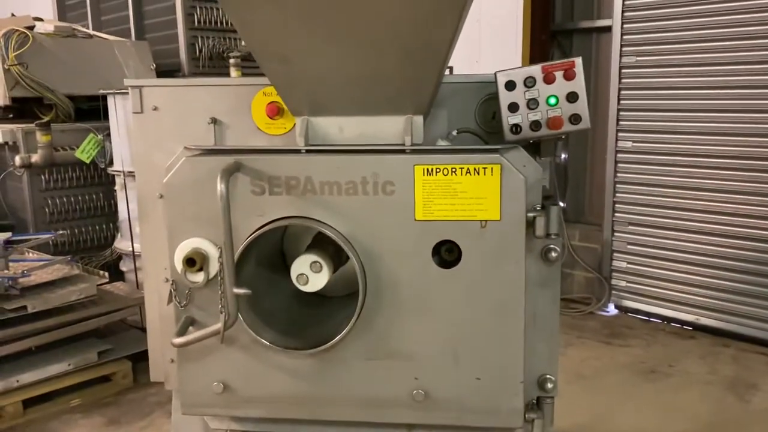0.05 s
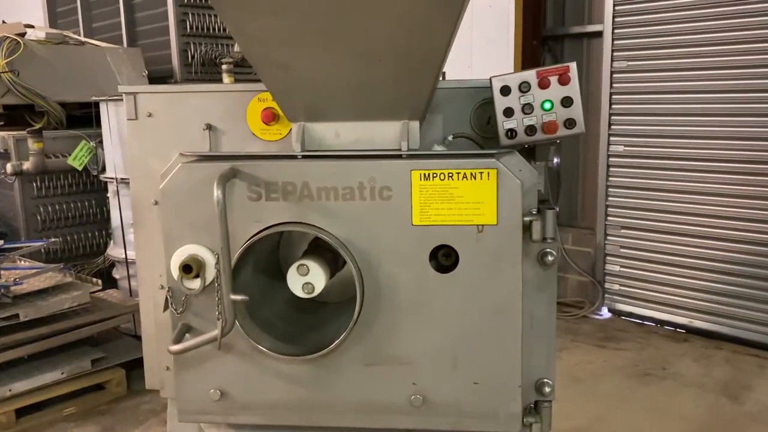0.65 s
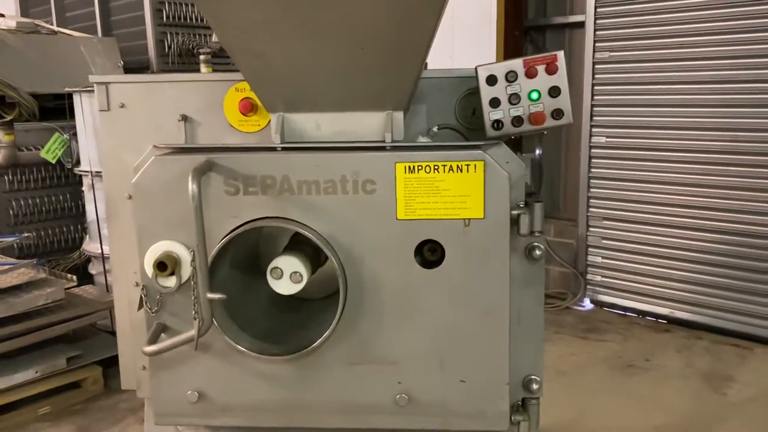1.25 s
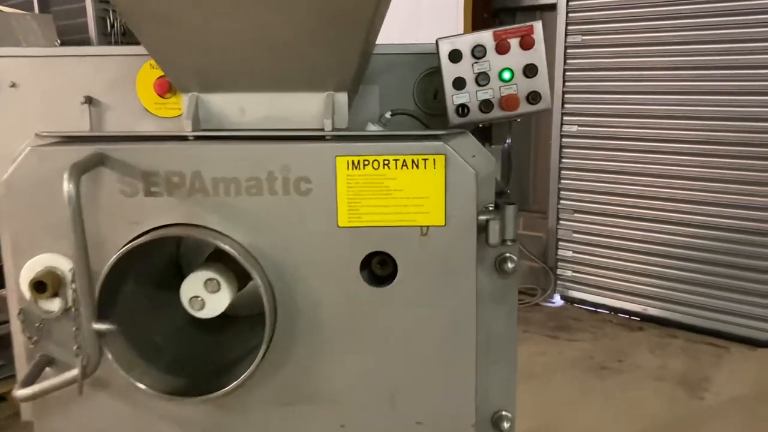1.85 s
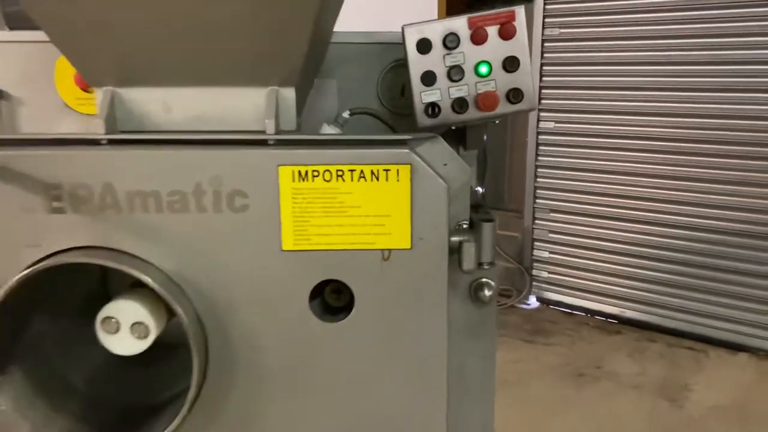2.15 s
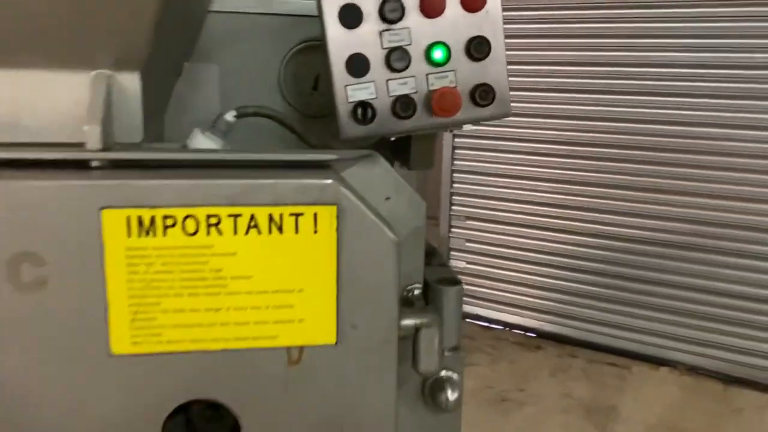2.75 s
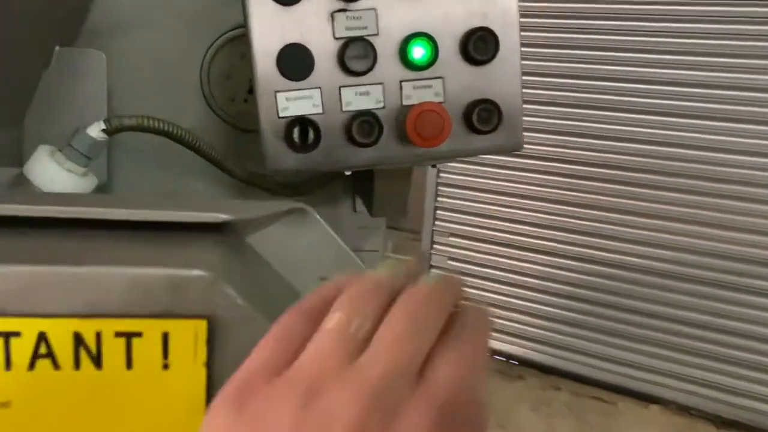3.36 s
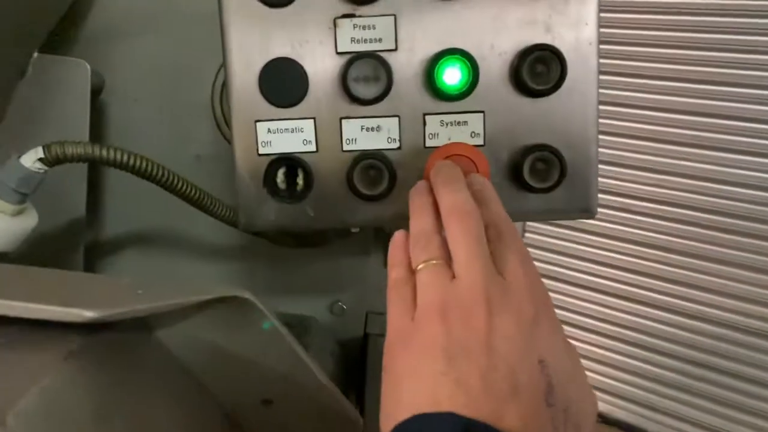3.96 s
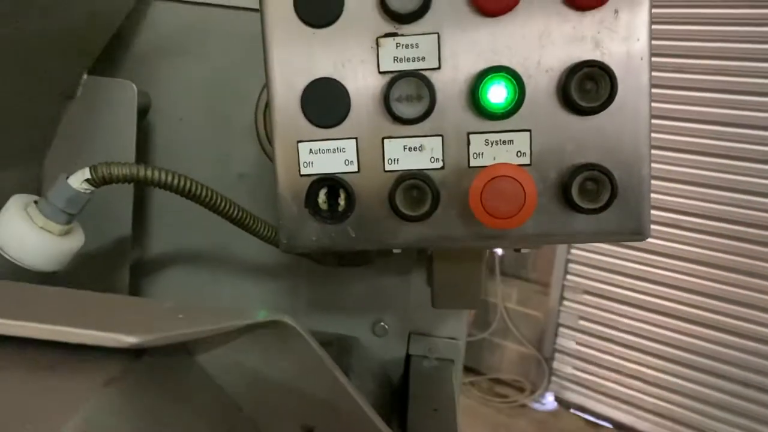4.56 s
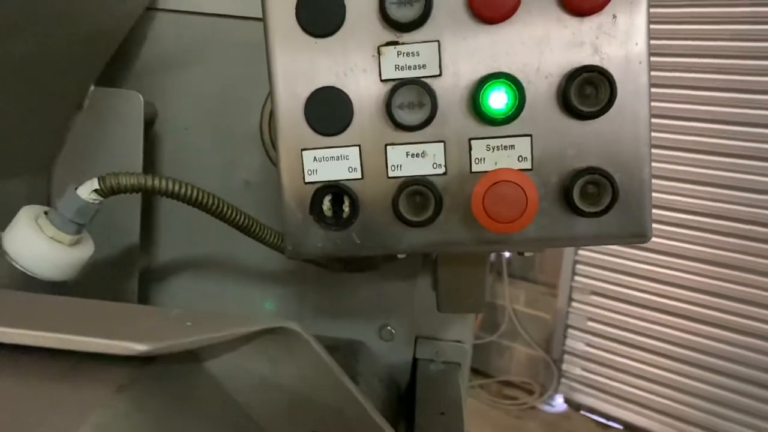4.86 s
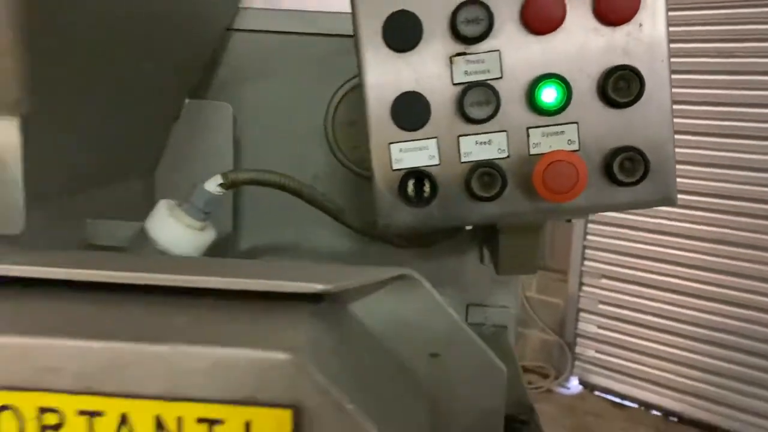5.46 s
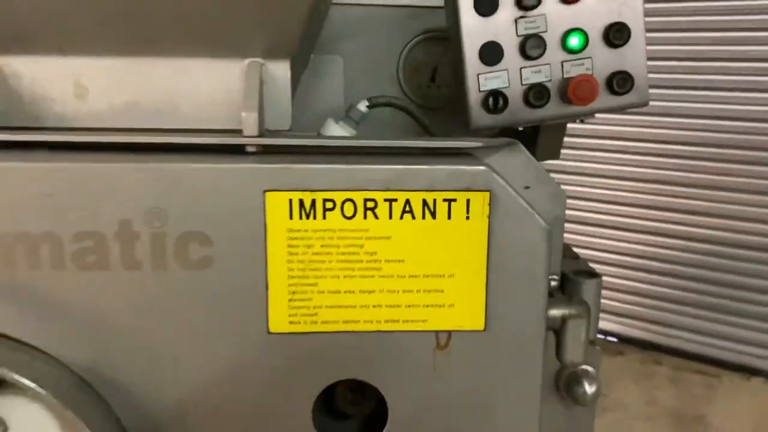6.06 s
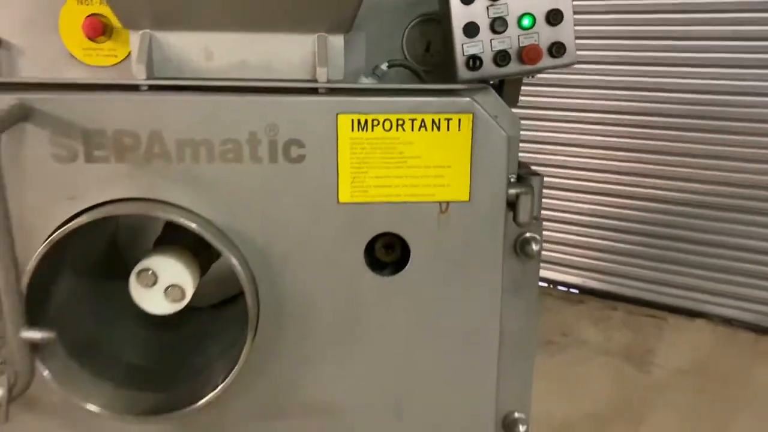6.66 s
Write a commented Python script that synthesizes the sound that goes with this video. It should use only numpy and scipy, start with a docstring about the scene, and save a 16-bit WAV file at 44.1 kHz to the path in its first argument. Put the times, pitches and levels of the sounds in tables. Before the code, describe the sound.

A large steel machine runs in a warehouse with a steady low rumble, clattering panels, rattling loose parts and a belt scouring a metal drum. It surges about every two seconds, and a drone grows as the microphone moves closer. A little past four seconds a stop button snaps with a dull clunk, and the drive coasts down with a few knocks and a brief whirr, leaving a faint hum.

```python
"""A warehouse, a stereo pair in front of a belt-and-drum food separator running empty. Its drive rumbles
in the steel housing, panels clatter, the belt scours the drum and loose parts rattle, swelling about every
two seconds as the belt binds. The microphone moves in close to the control box, the stop button is pressed
and let go, and the drive coasts to rest, leaving the faint hum of other equipment in the hall."""
import sys
import numpy as np
from scipy import signal
from scipy.fft import rfft, irfft, next_fast_len
from scipy.io import wavfile
from scipy.ndimage import uniform_filter1d, minimum_filter1d

SR = 44100
rng = np.random.default_rng(int(sys.argv[2]) if len(sys.argv) > 2 else 0)


def wav_out(sig):
    """Save sig, one row per channel (or a flat mono array), as 16-bit PCM at SR to the path in sys.argv[1]."""
    wavfile.write(sys.argv[1], SR, np.round(np.clip(np.atleast_2d(sig).T, -1, 1) * 32767).astype(np.int16))


N = 295470
TIME = np.arange(N) / SR
POWER_OFF_S, STANDSTILL_S, HALL_T60_S = 4.24, 5.92, 1.52

# Speed of the motor shaft: time_s, turns_hz
SHAFT_SPEED = [(0, 16.14), (4.08, 16.14), (4.26, 14.75), (5.0, 9.5), (5.9, 1.5)]
# Microphone's path, from in front (0) to the control box (1): time_s, nearness
NEARNESS = [(0, 0.1), (1.8, 0.21), (2.6, 0.46), (3.35, 0.88), (5.3, 0.98), (6.7, 0)]
# Knocks of loose parts: start_s, level_db (levels in all tables are relative)
KNOCKS = [(.5561, -30), (.99, -24.5), (1.2331, -33), (1.853, -26), (1.997, -34), (2.1221, -29),
          (2.285, -29), (2.435, -30), (2.5536, -30), (2.7896, -26), (2.834, -25.5), (2.9726, -25),
          (3.068, -19), (3.2016, -21), (3.4326, -28), (3.459, -28), (3.5169, -28), (3.5793, -31),
          (3.6232, -22.5), (3.7469, -27), (3.8697, -23.5), (3.99, -29), (4.0607, -29.5), (4.1649, -28),
          (4.1854, -29), (4.455, -27), (4.6423, -29), (4.7262, -26.5), (4.785, -25.5), (4.9162, -26.5),
          (4.9377, -26), (5.025, -21.5), (5.285, -31), (5.7, -41)]
# Spectra of the frame's rumble and the belt's hiss: frequency_hz, level_db
FRAME_COLOUR = [(20, -38), (35, -7), (50, -17), (68, 5.5), (90, -2), (115, 2.5), (150, -38)]
BELT_COLOUR = [(4500, -11), (7500, 2), (9500, -19), (11000, 19), (15500, 4)]


def drive(shaft):
    """Teeth and rollers make countless contacts, fewer as the shaft slows, and shake the machine."""
    activity = shaft / shaft[0] + .25
    throb = np.sin(2 * np.pi * np.cumsum(shaft) / SR)  # the load is uneven over each turn
    contacts = impacts(3000 * activity, scatter_db=2.5) * undb(.5 * throb)
    frame = noise(FRAME_COLOUR) * strength(idle_db=-44, per_load=0.3, near_db=9, slowing_db=24)
    return frame + panels(contacts) + drum(activity) + housing(contacts) + rattle(activity)


def housing(contacts):
    """The steel housing rumbles with the load; jolts from the drive make its lowest resonance boom."""
    # Spectra of rumble and boom: frequency_hz, level_db
    rumble_colour = [(70, -53), (100, -16.5), (120, -9.5), (142, -7.5), (165, -0.5), (190, -1.5), (212, 0),
                     (235, -8), (265, -14.5), (305, -10), (380, -16.5), (600, -17)]
    boom_colour = [(100, -30), (135, -19), (160, 2), (180, 5.5), (205, 4.5), (240, -11.5), (320, -22),
                   (500, -40)]
    # Jolts: start_s, level_db
    jolts = [(0.0, -15), (.16, -12), (.27, -18), (.96, -13), (1.008, -10), (1.11, -14), (1.17, -15.5),
             (1.36, -16), (2.38, -17), (2.53, -16), (2.822, -6), (2.95, -9), (3.03, -11), (3.2, -29),
             (3.86, -16.5), (4.06, -18), (4.33, -18), (4.78, -14), (4.94, -17), (5.1, -25), (5.22, -40),
             (5.49, -19.5)]
    rumble, boom = (stereo(steady(colour(contacts, spectrum), span_s=0.068), mono_noise(spectrum))
                    for spectrum in (rumble_colour, boom_colour))
    rumble *= strength(idle_db=-28.5, per_load=1.11, near_db=5, slowing_db=23)
    return rumble + boom * undb(-4) * blows(jolts, rise_s=0.016, t60=0.33)


def panels(contacts):
    """The panels clatter under the contacts; a few of their modes come up near the control box."""
    # Spectrum of the clatter: frequency_hz, level_db
    panel_colour = [(200, 1), (300, 6), (345, 4.5), (420, 1), (500, -2.5), (575, -4.5), (720, -4.5),
                    (860, -2), (1000, -3), (1110, -2.5), (1250, -10), (1750, -15), (2400, -20.5),
                    (5000, -66)]
    # Panel modes: pitch_hz, width_hz, level_db
    near_modes = [(300, 30, 0), (515, 20, -8), (570, 22, -1), (1110, 35, -4)]
    clatter = steel_part(contacts, panel_colour, t60=0.054, hall_db=-4)
    clatter *= strength(idle_db=-28, per_load=1.32, near_db=3.5, slowing_db=24)
    ringing = resonances(contacts, near_modes)
    return clatter + ringing * strength(idle_db=-44, per_load=1.5, near_db=6, slowing_db=21)


def drum(activity):
    """The belt scours the perforated drum: clear, wavering modes stand out of a dense metallic ring."""
    # Drum modes: pitch_hz, width_hz, level_db, near_boost_db
    drum_modes = [(1022, 12, 2.5, -6), (1113, 9, 1, 3), (1193, 8, 3.5, -1), (1248, 10, 1, 0),
                  (1355, 14, -2, -2), (1412, 9, 2.5, 0), (1442, 7, 1.5, -3), (1539, 9, 1.5, -2),
                  (1587, 7, -8, 6), (1795, 16, -2, -7), (1873, 10, 1.5, -8), (2530, 70, -4, -2),
                  (2670, 11, -4, -3)]
    # Spectrum of the dense ring: frequency_hz, level_db
    ring_colour = [(1000, -37), (1280, 2.5), (1450, 2), (1600, -4), (1720, -1), (1850, -2), (2050, -9),
                   (2300, -16), (2600, -10.5), (3100, -48)]
    # The machine's edge hides the drum's opening as the microphone passes: time_s, gain_db
    shade = [(0, 0), (3.05, 0), (3.33, -4), (5.3, -7.5), (5.9, -2)]
    near = curve(NEARNESS)
    forces = np.array([impacts(2500 * activity, scatter_db=4.5) for _ in range(2)])
    modes = sum(resonance(forces, hz, width_hz) * undb(db + near_db * near + 1.2 * wander(3.47))
                for hz, width_hz, db, near_db in drum_modes)
    dense = steel_part(forces[0], ring_colour, t60=0.051, hall_db=-8)
    gain = strength(idle_db=-32.5, per_load=0.27, near_db=0.5, slowing_db=24) * undb(curve(shade))
    return (undb(-1.5) * stereo(*unit(modes)) + dense) * gain


def rattle(activity):
    """Loose parts chatter under load and after each knock, and now and then tap."""
    # Spectrum of the chatter: frequency_hz, level_db
    chatter_colour = [(1200, -41), (1900, 8.5), (2550, 7), (3300, 4.5), (4400, -0.5), (5500, -7.5),
                      (7600, -10), (8500, -58), (11000, -9.5), (15500, -66)]
    shaking = impacts(1500 * activity, scatter_db=2.5) * undb(2 * wander(27.96))
    chatter = steel_part(shaking, chatter_colour, t60=0.048, hall_db=-10, even_hz=201)
    tapping = impacts(40 * activity, scatter_db=8.5)
    taps = steel_part(tapping, knock_colour(), t60=0.035, hall_db=-20, even_hz=450)
    running = strength(idle_db=-43.5, per_load=1.25, near_db=6, slowing_db=41)
    stirred = undb(-6) * blows(KNOCKS, rise_s=0.0049, t60=0.2)
    return (chatter + undb(-10.5) * taps) * np.hypot(running, stirred)


def gears(shaft):
    """Shaft harmonics carry in front, gear tones by the control box; all sink as the motor slows."""
    # Shaft harmonics: multiple, level_db
    orders = [(3, -43.5), (4, -40.5), (6, -40), (7, -40.5), (12, -30.5)]
    # Gear whine at full speed: pitch_hz, level_db
    whine_partials = [(289, -30), (511, -39), (654, -39.5), (1141, -39.5)]
    # Gear mesh drone at the microphone: time_s, level_db
    drone_level = [(0, -40), (.3, -38), (.45, -31.5), (1.6, -29.5), (2.3, -29.5), (2.52, -22.5),
                   (2.78, -25), (3.08, -20), (3.3, -22), (3.65, -21.5), (4.1, -21), (4.24, -24)]
    mesh_hz = 240.4
    speed, near = shaft / shaft[0], curve(NEARNESS)
    harmonics = sum(undb(db) * tone(multiple * shaft, waver_db=2, waver_hz=3.74, drift=0.0016)
                    for multiple, db in orders)
    whine = sum(undb(db) * tone(hz * speed, waver_db=3, waver_hz=10, drift=.003)
                for hz, db in whine_partials)
    powered = undb(curve(drone_level)) * fade(POWER_OFF_S, t60=0.088)
    drone = powered * tone(mesh_hz * speed, waver_db=.6, waver_hz=6, drift=0.001)
    return drone + (harmonics * undb(-8 * near) + whine * near) * speed ** 3


def crunches():
    """A burst of coarse contacts shakes the panels each time the belt catches."""
    # Catches: start_s, level_db
    catches = [(.91, -20.5), (.96, -24.5), (1.01, -20), (1.12, -23), (1.2, -32), (1.28, -28), (1.39, -22),
               (2.96, -16), (3.04, -18), (3.21, -17), (4.71, -21), (4.9, -24)]
    # Their spectrum: frequency_hz, level_db
    spectrum = [(200, 8), (290, 12), (410, 4), (560, -6), (720, -9), (1020, 5.5), (1400, -6.5),
                (2100, -8.5), (2900, -19), (5000, -28)]
    crunch = steel_part(impacts(900, scatter_db=2), spectrum, t60=0.021, hall_db=-13, even_hz=120)
    return crunch * blows(catches, rise_s=.006, t60=0.41)


def belt_scrapes():
    """Under heavy load, fine uneven slips of the belt rasp on the drum's rim."""
    # Scrapes: start_s, rise_s, hold_s, release_s, level_db
    scrapes = [(2.811, 0.024, 0.24, 0.24, -32.5), (4.88, .06, .12, .1, -43)]
    # Their spectrum: frequency_hz, level_db
    spectrum = [(1700, -14), (2120, 0), (2300, -7), (2580, 2), (2760, -1), (2900, -16), (3450, -7),
                (3900, -13), (5500, -24), (7200, -19), (7700, -11), (8400, -24)]
    rasp = steel_part(impacts(900, scatter_db=6), spectrum, t60=0.033, hall_db=-11, even_hz=150)
    return rasp * sum(undb(db) * swell(*timing) for *timing, db in scrapes)


def belt_rubs():
    """Where the belt rubs harder, two neighbouring drum modes sing out and beat."""
    # Rubs: start_s, rise_s, hold_s, release_s, lower_hz, upper_hz, level_db
    rubs = [(0.026, .08, .68, 0.15, 1412, 1445, -35), (1.12, 0.1, 0.12, 0.45, 1414, 1442, -37),
            (1.85, 0.4, .3, .15, 1539, 1587, -38.5)]
    out = np.zeros(N)
    for *timing, lower_hz, upper_hz, db in rubs:
        pair = sum(tone(hz, waver_db=2, waver_hz=18, drift=.002) for hz in (lower_hz, upper_hz))
        out += unit(pair) * undb(db) * swell(*timing)
    return out


def belt_drag():
    """On its last turns the belt drags with a whirr and a hiss."""
    # Whirring modes: pitch_hz, width_hz, level_db
    whirr_modes = [(840, 30, 0), (1380, 45, 0), (1490, 50, -2), (1790, 40, -7), (2020, 40, -15),
                   (2320, 25, -10), (2540, 70, -6), (2630, 30, -11)]
    # Spectrum of the hiss: frequency_hz, level_db
    hiss_colour = [(1400, 1), (2950, -5), (5000, 4), (7000, -3), (10000, -19)]
    forces = np.array([impacts(1500, scatter_db=0) for _ in range(2)])
    whirr = stereo(*resonances(forces, whirr_modes)) * undb(-46)
    hiss = noise(hiss_colour) * undb(-62.5)
    return (whirr + hiss) * swell(start_s=5.537, rise_s=0.2, hold_s=0.19, release_s=0.24)


def belt_hiss():
    """The running belt hisses unevenly, fainter beside the control box."""
    hiss = noise(BELT_COLOUR) * undb(0.95 * wander(33) + wander(4.3))
    return hiss * strength(idle_db=-69, per_load=0.56, near_db=-12, slowing_db=19)


def belt_swishes():
    """The belt gives short, very high swishes."""
    # Swishes: start_s, level_db
    swishes = [(.18, -51), (.27, -50), (.978, -45), (2.105, -48), (2.455, -45), (2.785, -46), (4.03, -52),
               (4.18, -48), (4.3, -50), (6.125, -50.5)]
    return noise(BELT_COLOUR) * blows(swishes, rise_s=0.004, t60=0.25)


def knocks():
    """Loose parts knock; close to the control box the crack of the first contact comes through."""
    # Spectrum of the crack: frequency_hz, level_db
    crack_colour = [(1500, 2), (2600, 7), (3600, -3), (5000, 4.5), (7400, -1), (9000, -26.5), (15000, -16)]
    body = clicks(KNOCKS, knock_colour(), t60=0.17, gain_db=-2.5, hall_db=-10)
    crack = clicks(KNOCKS, crack_colour, t60=0.025, gain_db=-4, hall_db=-18)
    return body + crack * curve(NEARNESS) ** 2


def clunk():
    """One dull clunk in the machine carries into the hall."""
    # The blow: start_s, level_db
    blow = [(4.343, -13)]
    # Its spectrum: frequency_hz, level_db
    spectrum = [(200, 3), (450, -10), (1100, 3), (2200, -18.5), (5000, -22)]
    return clicks(blow, spectrum, t60=.2, gain_db=-7, hall_db=4)


def stop_button():
    """Close up, the stop button snaps back and its spring rings."""
    # Snaps: start_s, level_db
    snaps = [(4.3216, -27.5), (4.364, -20), (4.3924, -29), (4.4084, -27.5)]
    # Their spectrum: frequency_hz, level_db
    spectrum = [(800, -25), (2400, 14), (4000, 4), (5500, 5), (7200, 5), (9000, -16), (11000, -5),
                (15500, -31)]
    # Spring modes: pitch_hz, level_db, t60_s
    modes = [(5500, -13, .05), (6650, -12, .06), (7300, -15, .04)]
    return clicks(snaps, spectrum, t60=0.14, gain_db=-5, hall_db=-16) + struck_modes(snaps, modes)


def ticks():
    """A part ticks sharply and rings for an instant."""
    # Ticks: start_s, level_db
    hits = [(3.074, -16), (3.083, -27), (5.025, -29), (5.2842, -28), (6.124, -42)]
    # Their spectrum: frequency_hz, level_db
    spectrum = [(1500, 1), (3800, -9), (6000, 1), (8000, 6), (11000, 5.5), (15500, -3)]
    # The part's modes: pitch_hz, level_db, t60_s
    modes = [(6080, -12, .05), (7700, -16, .04)]
    return clicks(hits, spectrum, t60=0.026, gain_db=-10, hall_db=-7) + struck_modes(hits, modes)


def clinks():
    """A loose steel part clinks in a few clear modes."""
    # Clinks: start_s, level_db
    hits = [(1.234, -34), (3.0735, -31), (5.025, -30.5), (5.285, -43)]
    # The part's modes: pitch_hz, level_db, t60_s
    modes = [(2370, -2, .22), (2555, -1, .22), (3860, 0, 0.19), (4290, -10, 0.12), (6220, -5, 0.04),
             (6480, -7, .05)]
    return struck_modes(hits, modes)


def settling():
    """Soft scuffs and low bumps of the frame as the drive comes to rest."""
    # Scuffs and bumps: start_s, level_db
    scuffs = [(6.14, -53), (6.235, -51), (6.45, -62)]
    bumps = [(5.97, -42), (6.13, -40.5)]
    # Spectrum of the scuffs: frequency_hz, level_db
    scuff_colour = [(600, -15), (1500, 1.5), (2600, 3.5), (5000, -3), (7000, -6), (15000, -12.5)]
    scuffing = noise(scuff_colour) * blows(scuffs, rise_s=0.012, t60=0.81)
    return scuffing + noise(FRAME_COLOUR) * blows(bumps, rise_s=0.016, t60=0.47)


def hall():
    """Other equipment hums on, a little roughly, over low room tone."""
    # Hum: pitch_hz, level_db
    partials = [(75.4, -56), (145.3, -50), (207, -64), (263.8, -59.5)]
    # Room tone: frequency_hz, level_db
    room_colour = [(22, -24), (45, -7), (62, 0.5), (78, 2), (105, -21), (200, -20), (320, -20), (550, -27),
                   (1500, -34.5), (3000, -44), (7000, -64), (15000, -47)]
    hum = sum(undb(db) * tone(hz, waver_db=1.5, waver_hz=25, drift=0.006) for hz, db in partials)
    room_db = -49 + 1.2 * wander(3.8)
    return hum + noise(room_colour) * undb(room_db)


def knock_colour():
    """The spectrum that loose parts ring with when they knock or tap."""
    # frequency_hz, level_db
    spectrum = [(500, 19.5), (1200, 9), (2700, 10.5), (4300, -5.5), (5600, -6), (7500, -1.5), (9500, -36.5),
                (15500, -19)]
    return spectrum


def strength(idle_db, per_load, near_db, slowing_db):
    """A part's gain follows load and microphone position, and loses slowing_db per tenfold slowing."""
    # The belt binds and loads the drive: start_s, rise_s, hold_s, release_s, load_db
    surges = [(0.85, 0.18, 0.32, 0.42, 4), (1.851, 0.18, 1, 0.53, 1.45), (2.697, 0.15, 0.3, 0.27, 3.5),
              (4.606, 0.38, 0.045, 0.13, 4)]
    load_db = sum(db * swell(*timing) for *timing, db in surges)
    shaft = curve(SHAFT_SPEED)
    quiet_below = 0.44  # share of full speed
    coast_db = slowing_db * np.log10(np.minimum(shaft / shaft[0] / quiet_below, 1))
    return undb(idle_db + per_load * load_db + near_db * curve(NEARNESS) + coast_db)


def impacts(rate_hz, scatter_db):
    """Random contacts of uneven size; their rate may move."""
    hit = rng.random(N) < rate_hz / SR
    size = undb(scatter_db * np.minimum(rng.exponential(size=N), 3))
    return unit(hit * size * rng.choice([-1, 1], N) / np.sqrt(rate_hz))


def steel_part(force, spectrum, t60, hall_db, even_hz=80):
    """Steel rings under contacts that keep shifting from place to place, and the hall answers."""
    def channel():
        direct = ring(force, t60, even_hz, count=24)
        reverb = undb(hall_db) * ring(force, HALL_T60_S, count=4)
        return unit(colour(direct + reverb, spectrum))
    return stereo(channel(), channel())


def ring(x, t60, even_hz=160, count=1):
    """Excite a crowd of close, decaying modes, drawn anew for each of count stretches of time."""
    t = TIME[:int(t60 * SR) + 2]
    size = next_fast_len(2 * len(t))
    out = np.zeros(N + len(t))
    for span in np.array_split(np.arange(N), count):
        response = rfft(rng.standard_normal(2 * SR)[:len(t)] * decay(t, t60), size)
        # level the spectrum by its mean power within even_hz either side
        power = uniform_filter1d(np.abs(response) ** 2, size=int(2 * even_hz * size / SR) + 1)
        rung = signal.fftconvolve(x[span], irfft(response / np.sqrt(power), size)[:len(t)])
        out[span[0]:span[0] + len(rung)] += rung
    return out[:N]


def clicks(hits, spectrum, t60, gain_db, hall_db):
    """Each blow is a short burst of dense modes with a tail from the hall."""
    envelope = undb(gain_db) * blows(hits, rise_s=.0007, t60=t60)
    mid, side = (envelope * mono_noise(spectrum) for _ in range(2))
    return stereo(*(x + undb(hall_db) * ring(x, HALL_T60_S / 2) for x in (mid, side)))


def struck_modes(hits, modes):
    """Each blow sets the same few modes ringing, in a different phase at each capsule."""
    out = np.zeros((2, N))
    for start_s, hit_db in hits:
        start = int(start_s * SR)
        t = TIME[:min(SR // 2, N - start)]
        for hz, db, t60 in modes:
            phase = 2 * rng.random((2, 1))
            envelope = undb(hit_db + db) * np.minimum(t * hz / 2, 1) * decay(t, t60)
            out[:, start:start + len(t)] += np.sin(2 * np.pi * hz * t + phase) * envelope
    return out


def resonance(x, hz, width_hz):
    """One ringing mode at rms 1."""
    pole = np.exp(-np.pi * width_hz / SR)
    return unit(signal.lfilter([1, 0, -1], [1, -2 * pole * np.cos(2 * np.pi * hz / SR), pole ** 2], x))


def resonances(x, modes):
    """Several modes under one force, together at rms 1."""
    return unit(sum(undb(db) * resonance(x, hz, width_hz) for hz, width_hz, db in modes))


def tone(hz, waver_db, waver_hz, drift):
    """A partial whose level and pitch waver."""
    turns = np.cumsum(hz * (1 + drift * wander(waver_hz))) / SR + rng.random()
    return unit(np.sin(2 * np.pi * turns) * undb(waver_db * wander(waver_hz)))


def noise(spectrum):
    """Coloured stereo noise."""
    return stereo(mono_noise(spectrum), mono_noise(spectrum))


def mono_noise(spectrum):
    """Coloured noise at rms 1."""
    return unit(colour(rng.standard_normal(N), spectrum))


def stereo(mid, side):
    """Bass reaches both capsules alike; treble comes from all around."""
    # Stereo width: frequency_hz, side_gain_db
    width = [(60, -24), (130, -33), (290, -16.5), (640, -7), (1400, -5), (3100, -4.5), (7000, -7),
             (9000, 4), (15000, -3)]
    side = irfft(rfft(side) * undb(per_bin(width)), N)
    return np.array([mid + side, mid - side])


def colour(x, spectrum):
    """Filter by a spectrum that falls away beyond its ends."""
    (low_hz, low_db), (high_hz, high_db) = spectrum[0], spectrum[-1]
    closed = [(low_hz / 4, low_db - 60), *spectrum, (high_hz * 4, high_db - 60)]
    return irfft(rfft(x) * undb(per_bin(closed)), N)


def per_bin(points):
    """Join (Hz, value) points on a log-frequency axis."""
    hz, value = np.transpose(points)
    return np.interp(np.log(np.maximum(np.fft.rfftfreq(N, 1 / SR), 1)), np.log(hz), value)


def blows(hits, rise_s, t60):
    """Envelope of a row of blows: each builds quickly and dies away."""
    envelope = np.zeros(N)
    for start_s, db in hits:
        start = int(start_s * SR)
        t = TIME[:min(SR, N - start)]
        envelope[start:start + len(t)] += undb(db) * (1 - np.exp(-t / rise_s)) * decay(t, t60)
    return envelope


def swell(start_s, rise_s, hold_s, release_s):
    """Rise to 1, hold and let go."""
    return np.interp(TIME, start_s + np.cumsum([0, rise_s, hold_s, release_s]), [0, 1, 1, 0])


def fade(start_s, t60):
    """Full strength up to a moment, then a steady decay."""
    return decay(np.maximum(TIME - start_s, 0), t60)


def decay(t, t60):
    """Fall by 60 dB every t60 seconds."""
    return np.exp(-np.log(1000) * t / t60)


def curve(points):
    """Join (s, value) points by straight lines."""
    return np.interp(TIME, *np.transpose(points))


def wander(rate_hz):
    """Smooth random motion at rms 1."""
    step = int(SR / rate_hz)
    held = np.repeat(rng.standard_normal(N // step + 1), step)
    return unit(uniform_filter1d(uniform_filter1d(held, step), step)[:N])


def steady(x, span_s):
    """Even out level changes slower than span_s."""
    return x / np.sqrt(uniform_filter1d(x ** 2, size=int(span_s * SR)) + 1e-12)


def unit(x):
    """Scale to rms 1."""
    return x / np.sqrt(np.mean(x ** 2))


def undb(db):
    """Decibels to gain."""
    return 10 ** (np.asarray(db) / 20)


def scene():
    """The machine, shifting left as the microphone moves in, and the hall around it."""
    shaft = curve(SHAFT_SPEED)
    left_minus_right_db = -1.07 + 2.5 * curve(NEARNESS)
    pan = undb(np.array([[1], [-1]]) * left_minus_right_db / 2)
    running = drive(shaft) + belt_hiss() + gears(shaft)
    machine = running * pan * fade(STANDSTILL_S, HALL_T60_S)  # dies with the hall's reverberation
    strikes = knocks() + clunk() + stop_button() + ticks() + clinks() + settling()
    belt = belt_swishes() + crunches() + belt_scrapes() + belt_drag() + belt_rubs()
    return machine + strikes + belt + hall()


def record(dry):
    """The two capsules differ in colour and phase; a limiter holds the peaks; the top is cut steeply."""
    # Balance of the pair: frequency_hz, left_minus_right_db
    balance = [(60, 1), (200, 1.4), (700, 2.5), (1300, -2), (2400, -0.5), (4400, 4), (8000, -0.5),
               (15000, 0)]
    # Phase between the capsules: frequency_hz, left_lead_rad
    phase_lead = [(20, 0), (600, .35), (3000, .6), (4000, .2), (8100, 0)]
    ceiling, top_hz = .9, 15900
    left_response = undb(per_bin(balance) / 2) * np.exp(.5j * per_bin(phase_lead))
    fade_in = np.minimum(TIME / .005, 1)
    pair = irfft(rfft(dry * fade_in) * np.array([left_response, 1 / left_response]), N)
    allowed_gain = ceiling / np.maximum(np.abs(pair).max(axis=0), ceiling)
    limiter_gain = uniform_filter1d(minimum_filter1d(allowed_gain, size=401), size=401)
    lowpass = signal.ellip(10, .2, 80, top_hz, fs=SR, output="sos")
    return signal.sosfilt(lowpass, pair * limiter_gain)


dry = scene()
out = record(dry)
wav_out(out)
```